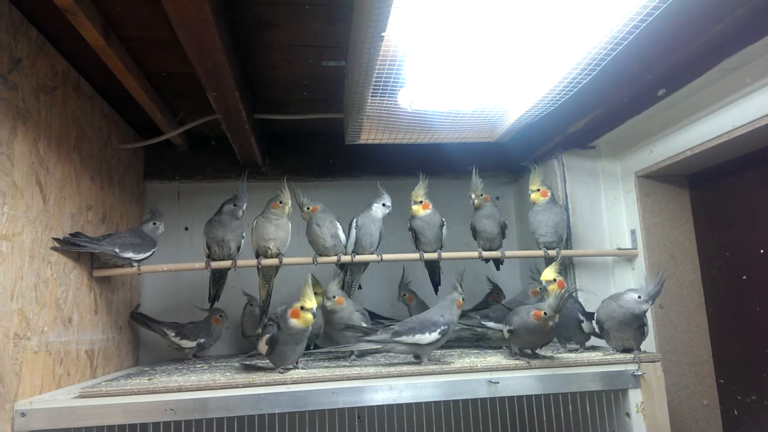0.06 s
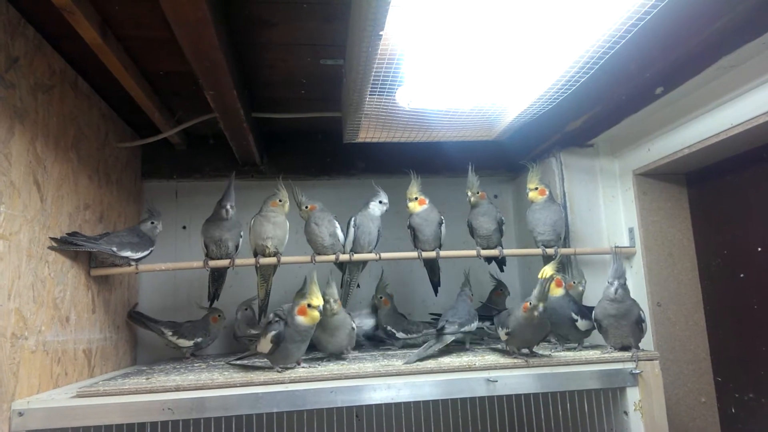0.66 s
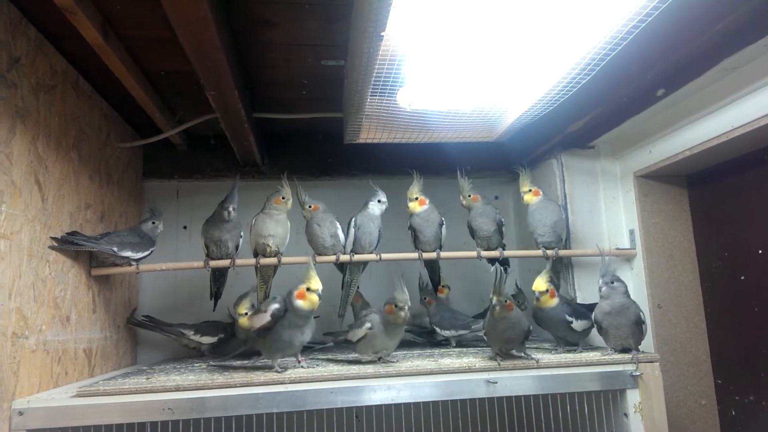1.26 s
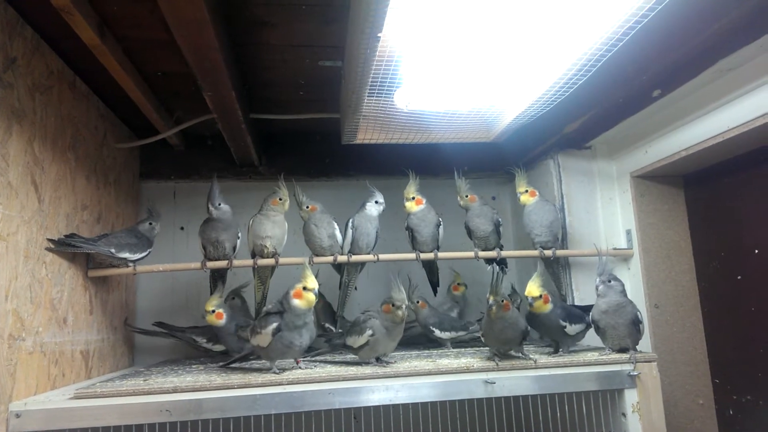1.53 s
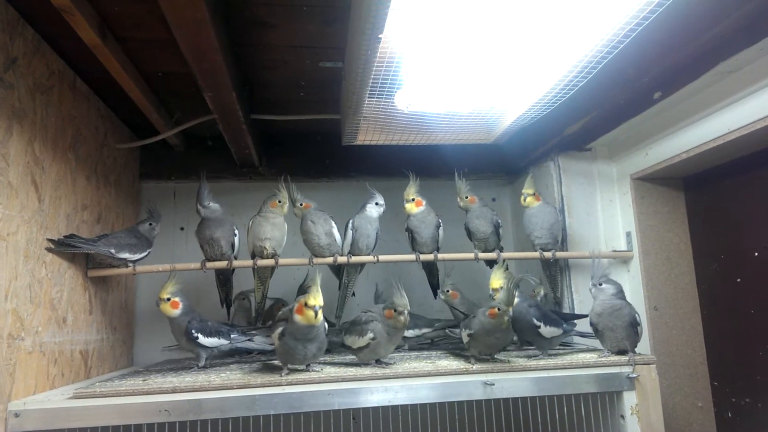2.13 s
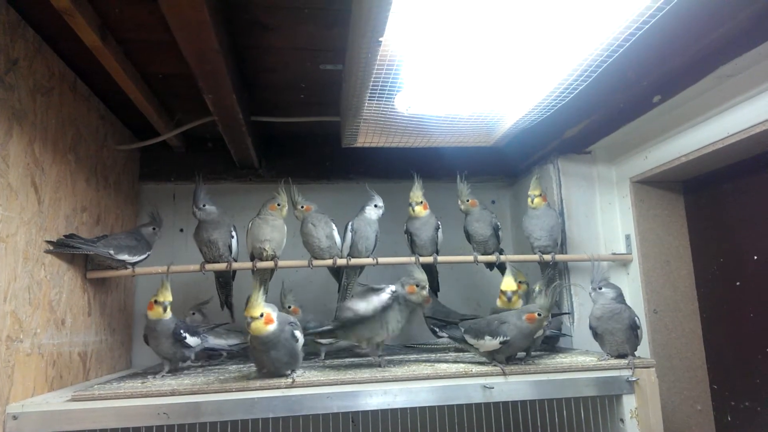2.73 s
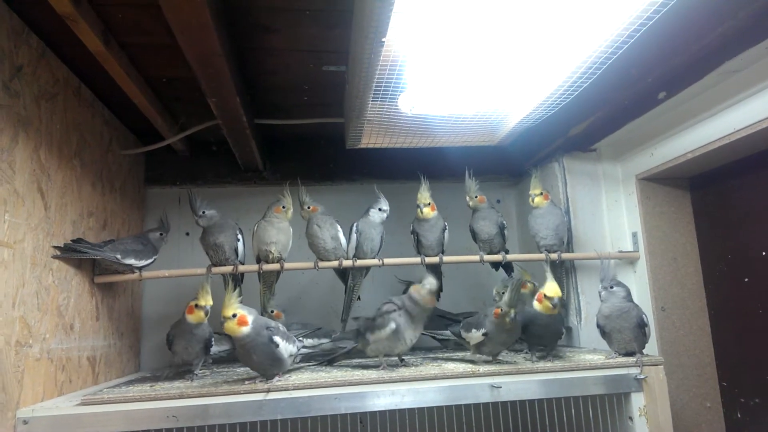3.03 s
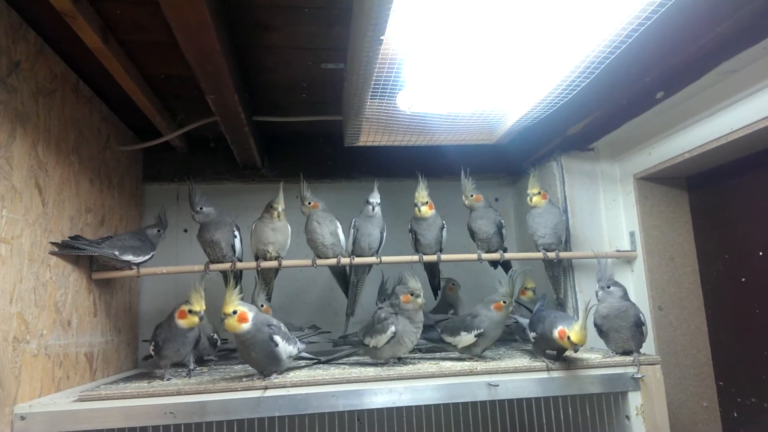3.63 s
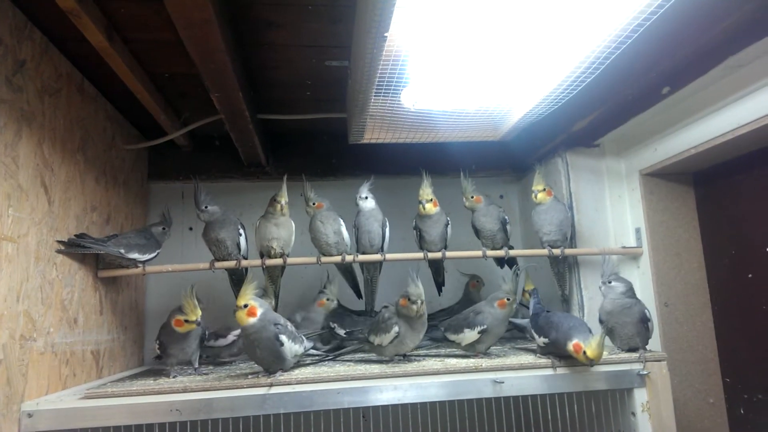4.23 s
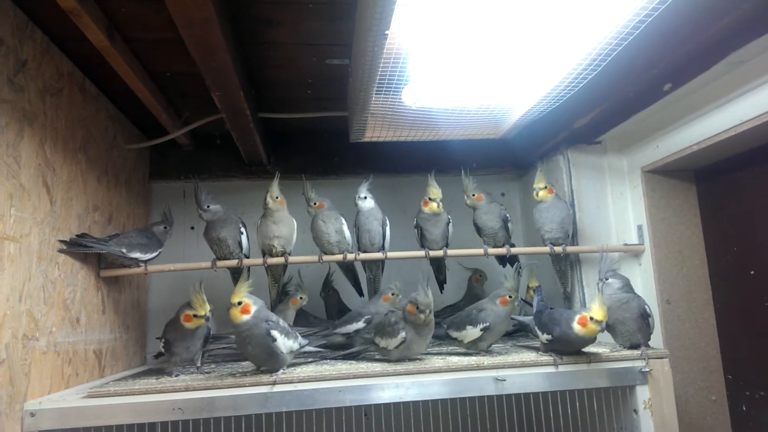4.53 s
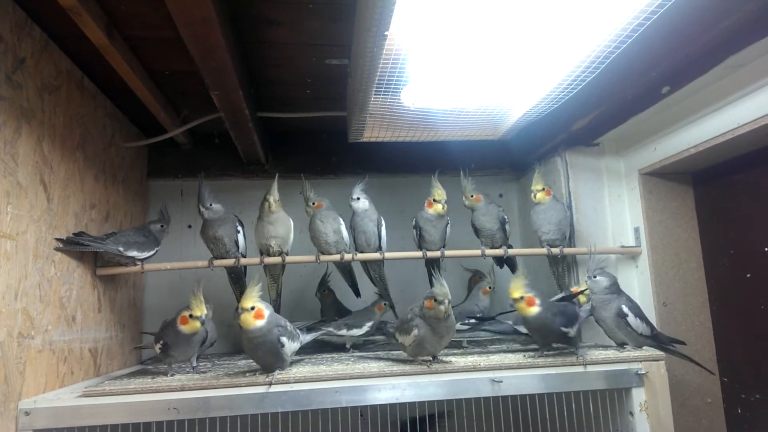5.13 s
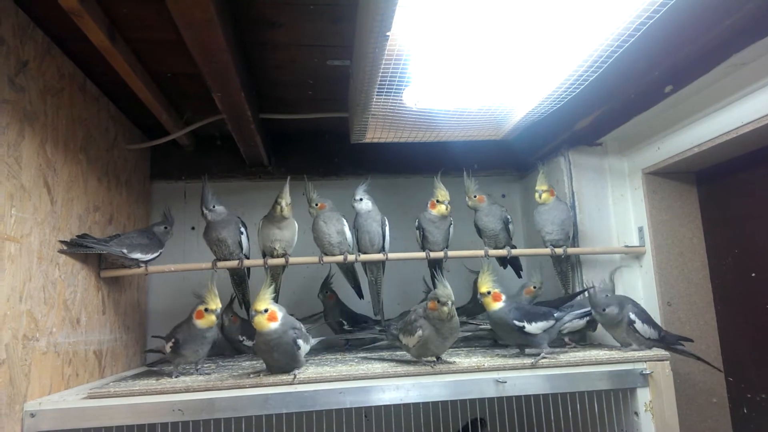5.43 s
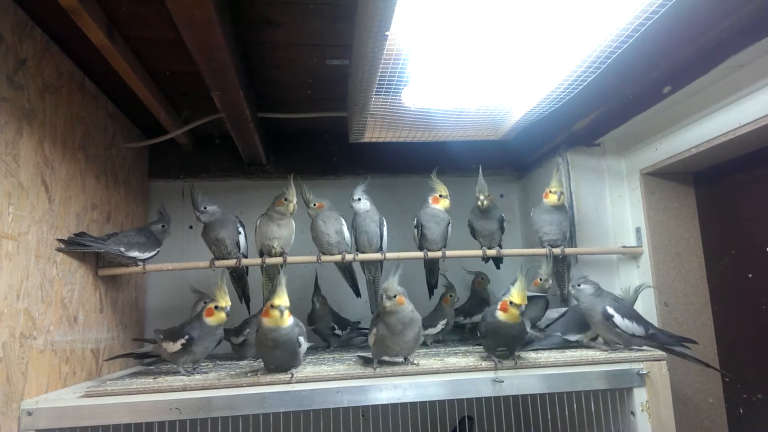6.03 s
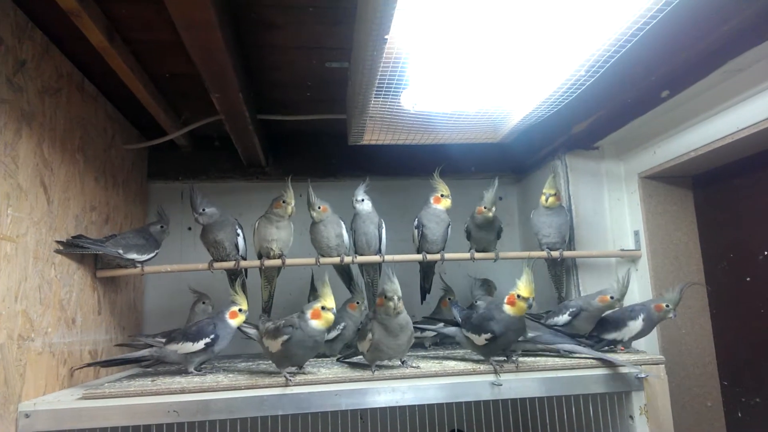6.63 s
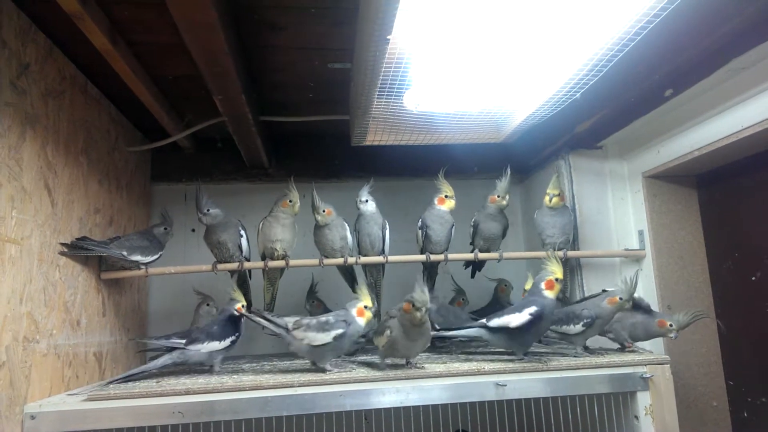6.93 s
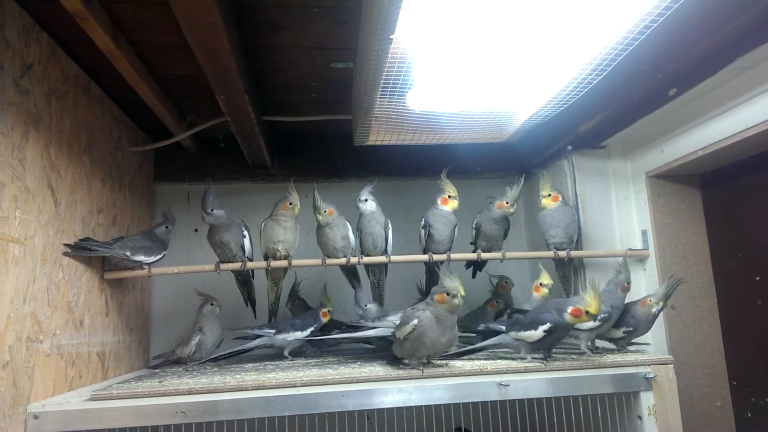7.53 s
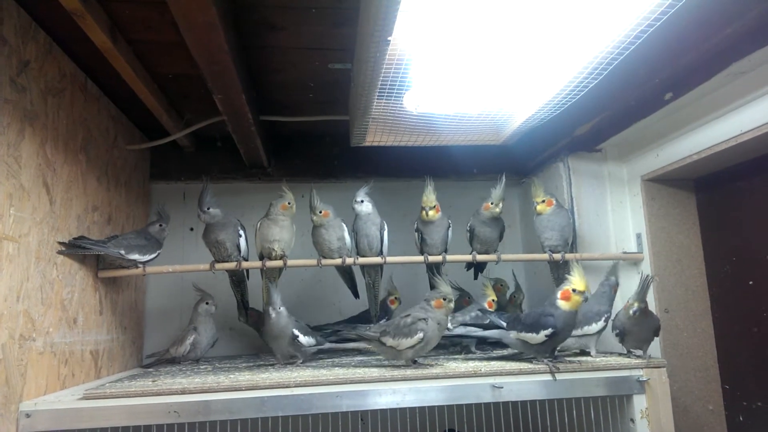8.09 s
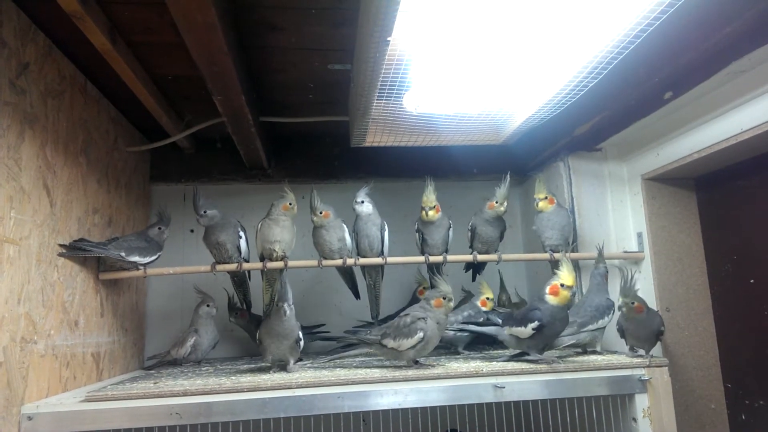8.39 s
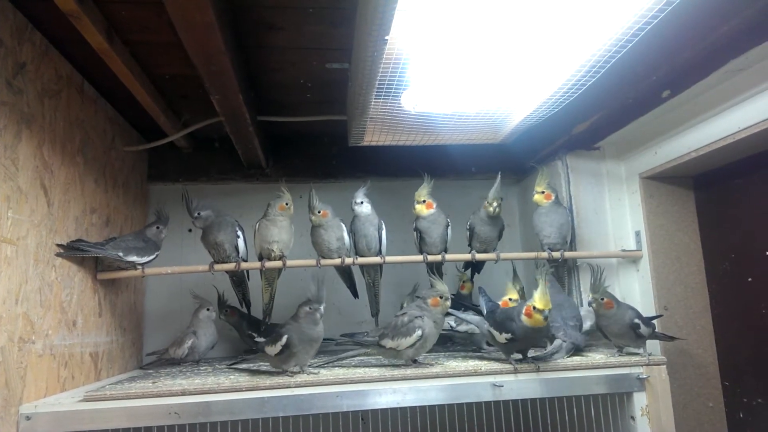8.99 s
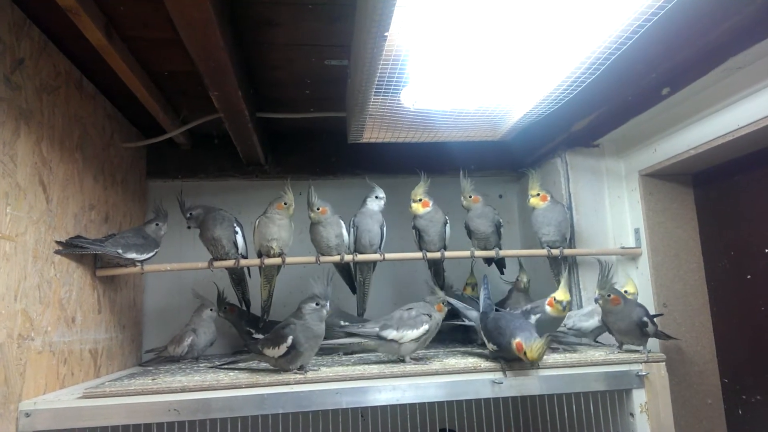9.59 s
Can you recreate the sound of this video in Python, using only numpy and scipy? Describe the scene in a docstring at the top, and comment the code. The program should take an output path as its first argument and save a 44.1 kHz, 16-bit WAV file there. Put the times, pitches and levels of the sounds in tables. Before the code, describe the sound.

Small parrots chirp now and then indoors, with light claw taps on a wooden shelf, soft rustling and a faint low hum.

```python
"""Cockatiels chirp, give two arched calls, a quick run of chips and a soft falling call in a small aviary.
Each note is a trembling syrinx tone whose harmonics are shaped by throat and beak.
Feet knock and claws tick on a wooden shelf, litter rustles, feathers are shaken and a beak snaps.
Calls and contacts ring briefly in the room, where a low hum and rumble swell and fade
over faint hiss; a thin high whine sets in about halfway."""
import sys
import numpy as np
from scipy import signal
from scipy.fft import rfft, irfft, next_fast_len
from scipy.io import wavfile
from scipy.ndimage import map_coordinates

SR = 44100
rng = np.random.default_rng(int(sys.argv[2]) if len(sys.argv) > 2 else 0)


def to_wav(s):
    """Save 16-bit WAV."""
    ch = np.atleast_2d(s).T  # columns
    pcm = np.round(np.clip(ch, -1, 1) * 32767)  # PCM
    wavfile.write(sys.argv[1], SR, pcm.astype(np.int16))


N = 429975
TOP_HZ = 15800

# Two-note chirps: start_s, dip_db, whistle_db, whistle_length_s, overtones_db, pan_db
CHIRP_PAIRS = [(1.169, -27.5, -20, 0.04, -19.5, -1), (3.548, -33.5, -24.5, 0.0317, -15, 2),
               (4.736, -29.5, -24.5, 0.038, -18, 2), (7.509, -30.5, -13, 0.019, -18.5, -2)]
# Sliding chips: start_s, length_s, from_hz, to_hz, slide_s, level_db, overtones_db, pan_db
CHIP_NOTES = [(5.066, 0.03, 6700, 3075, .011, -25, -14.5, -3),
              (5.172, .028, 6530, 4162, .0068, -17.5, -5, 0),
              (5.276, .026, 6250, 4120, 0.0044, -15.5, -11, 4),
              (5.382, .031, 5650, 3765, .0065, -20, -8, .5),
              (5.486, .029, 5700, 3790, .0069, -18.5, -7, 2.5),
              (5.646, 0.026, 3400, 3214, 0.012, -26.5, -9, 2),
              (5.796, .035, 3640, 3154, .015, -30, -5.5, 0),
              (8.815, .026, 7430, 3900, .008, -34.5, -5.5, -0.5),
              (8.903, 0.012, 6900, 7150, 0.0018, -35, -15, -3.5),
              (8.924, 0.028, 6900, 3260, 0.0081, -29.5, -20, -1.5)]
# Arched calls: start_s, length_s, crest_hz, gain_db, top_overtones_db
ARCH_NOTES = [(4.442, .257, 2683, -19.5, 2.5), (4.813, .23, 2967, -20.5, -4)]
# Pitch arch, foot 0 to crest 1: length_fraction, height_fraction
ARCH_SHAPE = [(0, 0.045), (.2, .27), (.46, .93), (.62, 0.966), (.72, .87), (.79, .5), (.865, .32),
              (.94, .8), (1, 0.95)]
# Falling call contour: time_s, pitch_hz, level_db
FALL_CONTOUR = [(7.683, 2930, -38), (7.701, 2516, -28.5), (7.721, 2335, -30.5), (7.747, 1800, -37.5),
                (7.76, 2555, -28.5)]
# Throat and beak response per call type: freq_hz, gain_db
CHIRP_TRACT = [(900, -58.5), (2000, -16), (2700, -7.5), (4100, 6), (5600, -14.5), (7500, -10.5),
               (8400, -13.5), (10500, -30.5), (12400, -20), (15200, -22.5)]
ARCH_TRACT = [(800, -54), (1300, -8.5), (2000, 1), (3050, 1.5), (3480, 5), (4100, -3), (5800, -15),
              (7500, -25), (10300, -41), (12200, -14.5), (13300, -20), (14200, -28.5), (15300, -22.5)]
FALL_TRACT = [(1200, -11.5), (2000, 3), (3100, 2.5), (4600, -22), (6200, -30.5), (7500, -30.5),
              (9300, -33.5), (12400, -22), (15500, -25)]
# Voice balance, left minus right: freq_hz, pan_db
VOICE_PAN = [(4000, -1.5), (8000, 3.5), (12000, 7)]

# Firm footfalls: start_s, knock_db, claw_db
FIRM_STEPS = [(.079, -54, -56), (.225, -58.5, -59.5), (.378, -54.5, -55.5), (.43, -55, -59.5),
              (.568, -49.5, -52), (.735, -54, -57.5), (.826, -56, -48), (.873, -47, -47.5),
              (1.0, -58.5, -55), (1.131, -64, -53), (1.467, -58, -56), (1.7, -55, -67.5), (1.85, -52, -56),
              (2.035, -52, -61.5), (2.183, -49, -56), (2.367, -53, -54), (2.498, -49.5, -48.5),
              (2.843, -47, -59.5), (3.123, -57, -58.5), (3.305, -56.5, -56.5), (3.794, -54.5, -67),
              (4.053, -59.5, -61), (4.1, -55.5, -66), (4.229, -53.5, -56.5), (4.392, -53, -56),
              (5.644, -59, -47.5), (5.871, -58, -50.5), (6.104, -54, -53.5), (6.455, -50.5, -46.5),
              (6.667, -49, -50.5), (6.935, -54.5, -49.5), (6.995, -49, -56), (7.07, -55.5, -55.5),
              (7.34, -54, -55), (7.578, -48.5, -45), (7.815, -53, -47), (7.893, -59, -55),
              (8.605, -53, -63), (8.675, -59, -55.5), (8.793, -51.5, -47), (8.98, -55.5, -57.5),
              (9.057, -52.5, -57.5), (9.43, -54, -58), (9.467, -56.5, -62), (9.524, -53, -53.5)]
# Contacts within one beak snap: start_s, level_db
SNAP_CONTACTS = [(8.164, -55.5), (8.1681, -36.5), (8.171, -43.5)]
# Contact spectra: freq_hz, gain_db
SHELF_SPECTRUM = [(120, -19), (300, -14), (520, -3), (750, -9.5), (1400, -1), (2100, -6), (3500, -25.5),
                  (6000, -21), (15000, -29.5)]
CLAW_SPECTRUM = [(800, -24.5), (2100, 3), (2700, 2.5), (3500, -1), (5200, -3.5), (7000, -15.5),
                 (10000, -26.5), (12200, -16), (15500, -20.5)]
BEAK_SPECTRUM = [(300, -13), (900, -13.5), (1600, 5.5), (2400, -2), (3400, 1.5), (5500, -2.5), (8000, -10),
                 (12000, -15.5), (15500, -31)]
# Feather shakes, one envelope each: time_s, level_db
SHAKE_ENVELOPES = [
    [(1.14, -59.5), (1.22, -50.5), (1.35, -51), (1.44, -65)],
    [(2.34, -64.5), (2.48, -54), (2.62, -46.5), (2.79, -47.5), (2.87, -58), (3.0, -71)],
]
# Foot activity of the flock: time_s, level_db
BUSTLE_ENVELOPE = [(0, -61), (.62, -71), (1.06, -58), (1.28, -57.5), (1.82, -60), (2.47, -66),
                   (2.77, -57.5), (3.1, -63), (3.9, -75.5), (4.55, -63.5), (5.21, -49), (5.59, -60.5),
                   (6, -59.5), (6.92, -50.5), (7.41, -56.5), (7.74, -53), (8.12, -57), (9.75, -61.5)]
# Rustle spectra: freq_hz, gain_db
FEATHER_SPECTRUM = [(29, -39), (50, -18.5), (131, -7.5), (183, -14), (288, -9.5), (333, -19), (375, -12),
                    (701, -16), (3100, -12), (9820, -25.5), (12200, -20), (15500, -26.5)]
LITTER_SPECTRUM = [(150, -27), (280, -8), (520, -2.5), (750, -2.5), (1400, -0.5), (2500, -4.5), (5000, -13),
                   (9000, -20.5), (12500, -18), (15500, -25.5)]

# Room modes: centre_hz, width_hz, gain_db
ROOM_MODES = [(124.5, 10, 1), (161, 27, -9), (280.9, 18, -14.5), (277, 20, -21), (394, 19, -20),
              (540, 120, -17)]
# Background spectra: freq_hz, gain_db
RUMBLE_SPECTRUM = [(20, -33), (50, -16.5), (72, 4), (95, -6.5), (150, -23), (400, -61)]
HISS_SPECTRUM = [(12, -20.5), (20, 0), (49, -11), (137, -3.5), (219, -20), (282, -7.5), (597, -16),
                 (725, -17.5), (1340, -11.5), (5380, -19.5), (8400, -25), (12100, -25.5), (15500, -33.5)]
# Background envelopes: time_s, level_db
HUM_ENVELOPE = [(0, -69), (.9, -73), (1.35, -63), (1.65, -72.5), (2.3, -67), (2.8, -53), (3.07, -68.5),
                (4.45, -78), (4.7, -61), (5.05, -64.5), (5.4, -50.5), (5.57, -67), (5.8, -54),
                (6.03, -64.5), (6.38, -62.5), (6.55, -56.5), (7.15, -67.5), (8.7, -68), (8.95, -58.5),
                (9.2, -69)]
RUMBLE_ENVELOPE = [(0, -72.5), (1.19, -82.5), (1.34, -60.5), (1.52, -79.5), (2.3, -76), (2.8, -61.5),
                   (2.93, -71.5), (4.92, -86.5), (5.08, -55.5), (5.4, -63.5), (5.59, -81), (6.7, -70.5),
                   (7.6, -76), (7.79, -67.5), (8, -77.5), (9.75, -79)]
WHINE_ENVELOPE = [(5.45, -105), (5.65, -81.5)]
# Left-right likeness of diffuse noise: freq_hz, correlation
NOISE_CORRELATION = [(60, .85), (250, 0.91), (500, 0.82), (1000, 0.024), (2500, -0.14), (12000, 0.078)]
# Noise balance, left minus right: freq_hz, pan_db
NOISE_PAN = [(60, -4.5), (400, -5.5), (1200, -0.5), (5000, -1.5), (12000, 3)]
# Room decay: freq_hz, t60_s
ROOM_DECAY = [(200, 0.081), (600, 0.34), (1500, 0.165), (3700, 0.16), (10000, 0.12)]


def contact_chirps(whistle_delay_s=.031):
    """A scratchy falling dip, then a pure whistle."""
    out = np.zeros((2, N))
    for start_s, dip_db, whistle_db, whistle_s, overtones_db, pan_db in CHIRP_PAIRS:
        dip = slide_note(.02, dip_db, overtones_db, from_hz=4220, to_hz=2682, slide_s=.008)
        whistle = slide_note(whistle_s, whistle_db, overtones_db, from_hz=3300, to_hz=3706, slide_s=.0047)
        add(out, start_s, panned(dip, pan_db))
        add(out, start_s + whistle_delay_s, panned(whistle, pan_db))
    return out


def chips():
    """Single sliding notes, most in one quick run."""
    out = np.zeros((2, N))
    for start_s, length_s, from_hz, to_hz, slide_s, level_db, overtones_db, pan_db in CHIP_NOTES:
        note = slide_note(length_s, level_db, overtones_db, from_hz, to_hz, slide_s)
        add(out, start_s, panned(note, pan_db))
    return out


def arched_calls(foot_hz=1326.5, attack_s=.018, release_s=.0098):
    """Pitch climbs, falls back and flicks up: reedy when low, purer and louder at the crest."""
    out = np.zeros((2, N))
    for start_s, length_s, crest_hz, gain_db, top_overtones_db in ARCH_NOTES:
        t = np.arange(int(length_s * SR)) / SR
        height = np.interp(t / length_s, *np.transpose(ARCH_SHAPE))
        pitch_hz = foot_hz + (crest_hz - foot_hz) * height
        gate = np.clip(np.minimum(t / attack_s, (length_s - t) / release_s), 0, 1)
        fade_db = np.interp(t / length_s, [.65, 1], [0, 7])
        level = gate * amp(gain_db - 4.5 + 1.5 * height - fade_db)
        tract = [(hz, db + top_overtones_db * (hz > 9000)) for hz, db in ARCH_TRACT]
        overtones_db = -3.5 - 5 * height
        hoarseness = amp(overtones_db / 2)
        note = syrinx(pitch_hz, level, overtones_db, tract, jitter=.035 * hoarseness,
                      flutter_db=2 * hoarseness, wet_db=6, rasp_db=overtones_db - 17.5, harmonics=7)
        add(out, start_s, panned(note, pan_db=-.08))
    return out


def falling_call(whistle_start_s=7.757):
    """A soft, clear call sinks, turns up and ends in a held whistle."""
    out = np.zeros((2, N))
    time_s, pitch_hz, level_db = np.transpose(FALL_CONTOUR)
    t = np.arange(time_s[0], time_s[-1], 1 / SR)
    level = amp(np.interp(t, time_s, level_db)) * signal.windows.tukey(len(t), .06)
    fall = syrinx(np.interp(t, time_s, pitch_hz), level, overtones_db=0, tract=FALL_TRACT,
                  jitter=.011, flutter_db=.5, wet_db=3, rasp_db=-24.5)
    whistle = slide_note(length_s=.057, level_db=-20.5, overtones_db=-3.5,
                         from_hz=2400, to_hz=3117, slide_s=.0041, tract=FALL_TRACT)
    add(out, time_s[0], fall)
    add(out, whistle_start_s, whistle)
    return out


def slide_note(length_s, level_db, overtones_db, from_hz, to_hz, slide_s, tract=CHIRP_TRACT):
    """A note starts soft and scratchy, slides onto its pitch and grows loud and pure there."""
    t = np.arange(int(length_s * SR)) / SR
    unsettled = np.exp(-(t / slide_s) ** 1.4)
    pitch_hz = to_hz + (from_hz - to_hz) * unsettled
    gate = np.clip(t / .003, 0, 1) * np.clip((length_s - t) / .006, 0, 1)
    level = amp(level_db) * unit_rms(gate * amp(-18 * unsettled ** .8))
    scratch = abs(from_hz / to_hz - 1) * np.cbrt(unsettled)  # wide slides are roughest
    return syrinx(pitch_hz, level, overtones_db, tract, jitter=.005 + .073 * scratch,
                  flutter_db=4 * scratch, wet_db=2.5, rasp_db=-38 + 27 * np.clip(2 * scratch, 0, 1))


def syrinx(pitch_hz, level, overtones_db, tract, jitter, flutter_db, wet_db, rasp_db, harmonics=9):
    """Trembling harmonics and rasp, shaped by throat and beak, sent through the room at equal energy."""
    n = len(pitch_hz)
    pitch_hz = pitch_hz * (1 + jitter * wobble(900, n))
    k = np.arange(1, harmonics + 1)[:, None]
    gains = amp(at_hz(tract, k * pitch_hz) + (k > 1) * overtones_db) * (k * pitch_hz < TOP_HZ)
    phase_rad = 2 * np.pi * np.cumsum(pitch_hz) / SR
    tone = (gains * np.sin(k * phase_rad)).sum(0) / np.sqrt((gains ** 2).sum(0) / 2)
    rasp = amp(rasp_db) * unit_rms(filtered(rng.standard_normal(n), colour(tract)))
    flutter = unit_rms(amp(flutter_db * wobble(500, n)))
    note = level * (tone + rasp) * flutter
    heard = room(note, wet_db)
    return heard * np.linalg.norm(note) / np.linalg.norm(heard, axis=1, keepdims=True)


def footsteps():
    """Each foot knocks the shelf while its claws tick."""
    out = np.zeros((2, N))
    for start_s, knock_db, claw_db in [*FIRM_STEPS, *light_steps()]:
        add(out, start_s, amp(knock_db) * impact(SHELF_SPECTRUM, t60_s=.097, wet_db=.5))
        add(out, start_s, amp(claw_db) * impact(CLAW_SPECTRUM, t60_s=.04, wet_db=1.5))
    return out


def light_steps(steps_per_s=7, knock_db=-60.5, claw_db=-59.5, spread_db=1):
    """Uneven soft steps, firmer when the flock is busy: start_s, knock_db, claw_db."""
    count = int(steps_per_s * N / SR)
    scatter = rng.uniform(-1, 1, (count, 3))
    start_s = (np.arange(count) + .5 + scatter[:, 0] / 2) / steps_per_s
    bustle_db = np.interp(start_s, *np.transpose(BUSTLE_ENVELOPE))
    firmness_db = .28 * (bustle_db - bustle_db.mean())[:, None] + spread_db * scatter[:, 1:]
    return np.column_stack([start_s, [knock_db, claw_db] + firmness_db])


def beak_snap():
    """A beak closes on something hard: three contacts merge into one click."""
    out = np.zeros((2, N))
    for start_s, level_db in SNAP_CONTACTS:
        add(out, start_s, amp(level_db) * impact(BEAK_SPECTRUM, t60_s=.028, wet_db=-.5))
    return out


def impact(spectrum, t60_s, wet_db, attack_s=.0013, ripple_db=3.5):
    """A burst coloured by the struck spot's resonances, ringing in the room; rms 1 over the first 25 ms."""
    t = np.arange(SR // 12) / SR
    spot = np.column_stack([np.geomspace(300, TOP_HZ, 26), ripple_db * rng.standard_normal(26)])
    burst = diffuse_noise(lambda hz: amp(at_hz(spectrum, hz) + at_hz(spot, hz)), len(t))
    heard = room(burst * amp(-60 * t / t60_s) * (1 - np.exp(-t / attack_s)), wet_db)
    return heard / heard[:, :SR // 40].std()


def feather_shakes(beat_hz=19.7, flick_s=2.499, throb_db=4):
    """Shaken plumage: a soft rush jumps with each wing flick and sinks until the next."""
    t = np.arange(N) / SR
    level = sum(amp(np.interp(t, *np.transpose(rows), left=-140, right=-140)) for rows in SHAKE_ENVELOPES)
    beat_fraction = ((t - flick_s) * beat_hz + .04 * wobble(8)) % 1
    throb = unit_rms(amp(-throb_db * beat_fraction + 2.4 * wobble(250)))
    return level * throb * diffuse_noise(colour(FEATHER_SPECTRUM))


def litter_rustle(touches_per_s=32, spread_db=4, scratch_t60_s=.012, echo_t60_s=.3):
    """Many light scratches of feet in litter, each with a short echo."""
    t = np.arange(SR // 5) / SR
    onsets = rng.random(N) < touches_per_s / SR
    touches = onsets * amp(spread_db * np.clip(rng.standard_normal(N), -2, 2))
    decay = amp(-60 * t / scratch_t60_s) ** 2 + .3 * amp(-60 * t / echo_t60_s) ** 2
    energy = np.abs(signal.fftconvolve(touches ** 2, decay)[:N])
    return envelope(BUSTLE_ENVELOPE) * unit_rms(np.sqrt(energy)) * diffuse_noise(colour(LITTER_SPECTRUM))


def room_tone(hiss_db=-63.5):
    """A low drone booms in the room's modes, over deep rumble and steady hiss."""
    def modes(hz):
        return sum(amp(db) / (1 + (2 * (hz - centre_hz) / width_hz) ** 2)
                   for centre_hz, width_hz, db in ROOM_MODES)
    hum = envelope(HUM_ENVELOPE) * diffuse_noise(modes)
    rumble = envelope(RUMBLE_ENVELOPE) * diffuse_noise(colour(RUMBLE_SPECTRUM))
    hiss = amp(hiss_db) * diffuse_noise(colour(HISS_SPECTRUM))
    return hum + rumble + hiss


def whine(pitch_hz=14998):
    """A faint, thin tone near the top of hearing."""
    return envelope(WHINE_ENVELOPE) * unit_rms(np.sin(2 * np.pi * pitch_hz * np.arange(N) / SR))


def room(x, wet_db, wall_gain=.16, walls=5):
    """Direct sound, near-wall reflections and a tail, drawn anew for each sound."""
    hz, t, spectra = signal.stft(rng.standard_normal((2, SR // 3)), SR, nperseg=256)
    decay = amp(-60 * t / at_hz(ROOM_DECAY, hz)[:, None])
    tail = signal.istft(spectra * decay, SR, nperseg=256)[1]
    response = tail / np.linalg.norm(tail[0])
    wall_delay_samples = rng.integers(SR // 500, SR // 70, (2, walls))
    response[[[0], [1]], wall_delay_samples] += wall_gain
    response *= amp(wet_db)
    response[[0, 1], [0, 3]] += 1  # direct path, right 3 samples later
    return signal.fftconvolve(np.atleast_2d(x), response, axes=1)


def diffuse_noise(gain, n=N):
    """Stereo noise of rms 1: bass alike in both channels, treble unrelated."""
    def mid_side_gain(hz):
        angle_rad = np.arccos(np.clip(at_hz(NOISE_CORRELATION, hz), -1, 1)) / 2
        return gain(hz) * [np.cos(angle_rad), np.sin(angle_rad)]
    mid, side = filtered(rng.standard_normal((2, n)), mid_side_gain)
    return unit_rms(panned_by_hz(np.array([mid + side, mid - side]), NOISE_PAN))


def amp(db):
    """Decibels to gain."""
    return 10 ** (np.asarray(db) / 20)


def unit_rms(x):
    """Scale to rms 1."""
    return x / np.sqrt(np.mean(x ** 2) + 1e-20)


def at_hz(points, hz):
    """Interpolate freq_hz, value rows on a log axis."""
    freq_hz, values = np.transpose(points)
    return np.interp(np.log(hz + 1), np.log(freq_hz), values)


def colour(spectrum):
    """Gain function of freq_hz, gain_db rows."""
    return lambda hz: amp(at_hz(spectrum, hz))


def envelope(rows):
    """Gain per sample from time_s, level_db rows."""
    return amp(np.interp(np.arange(N) / SR, *np.transpose(rows)))


def wobble(rate_hz, n=N):
    """Smooth random curve with knots at rate_hz."""
    knots = rng.standard_normal(int(n * rate_hz / SR) + 4)
    return map_coordinates(knots, [np.arange(n) * rate_hz / SR])


def filtered(x, response):
    """Apply a frequency response."""
    n = x.shape[-1]
    size = next_fast_len(n + 8192)
    return irfft(rfft(x, size) * response(np.fft.rfftfreq(size, 1 / SR)), size)[..., :n]


def panned(x, pan_db):
    """Tilt left over right by pan_db."""
    return x * amp([[pan_db / 2], [-pan_db / 2]])


def panned_by_hz(x, points):
    """Pan each frequency by freq_hz, pan_db rows."""
    return filtered(x, lambda hz: amp(np.outer([.5, -.5], at_hz(points, hz))))


def add(out, start_s, x):
    """Mix x into out from start_s."""
    part = out[:, max(round(start_s * SR), 0):][:, :x.shape[-1]]
    part += x[..., :part.shape[-1]]


def scene():
    """The flock and its room."""
    voices = panned_by_hz(contact_chirps() + chips() + arched_calls() + falling_call(), VOICE_PAN)
    background = room_tone() + whine()
    movement = feather_shakes() + litter_rustle() + beak_snap() + footsteps()
    return voices + movement + background


def record(dry):
    """Brick-wall low-pass at TOP_HZ."""
    return filtered(dry, lambda hz: hz < TOP_HZ)


dry = scene()
out = record(dry)
to_wav(out)
```